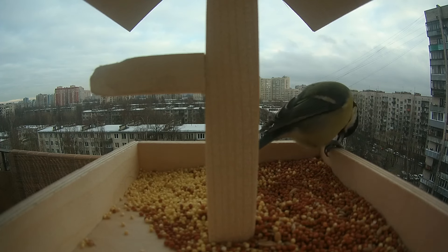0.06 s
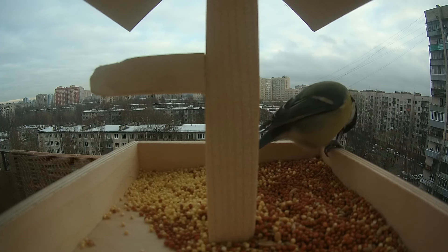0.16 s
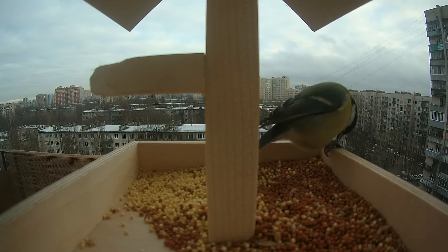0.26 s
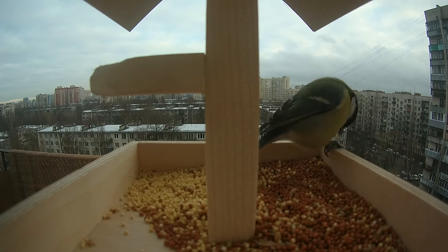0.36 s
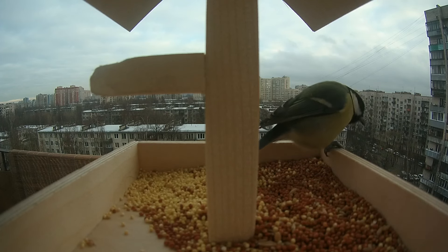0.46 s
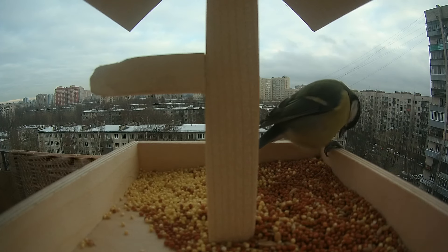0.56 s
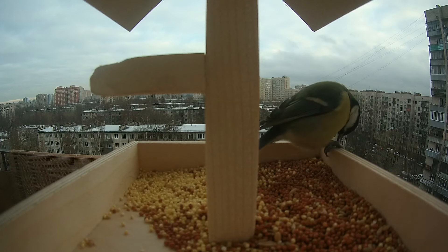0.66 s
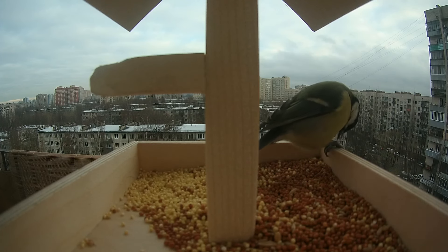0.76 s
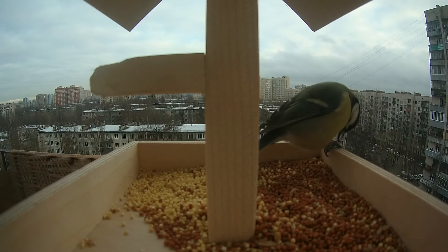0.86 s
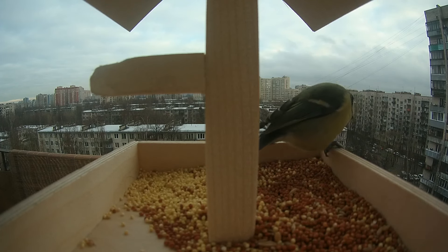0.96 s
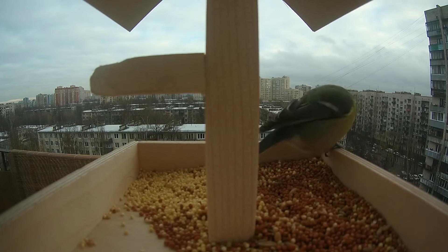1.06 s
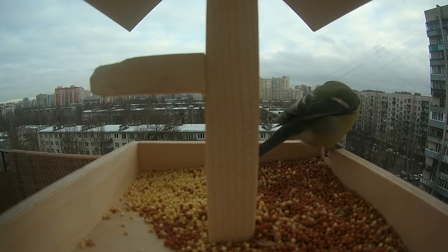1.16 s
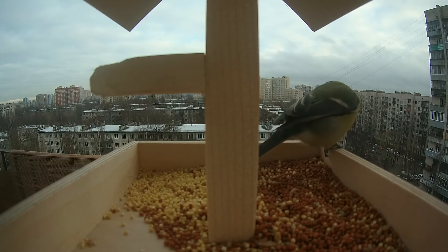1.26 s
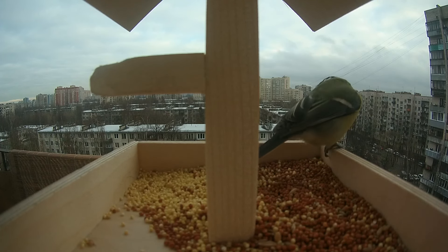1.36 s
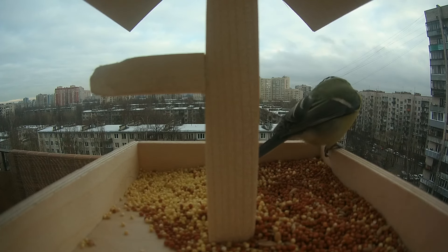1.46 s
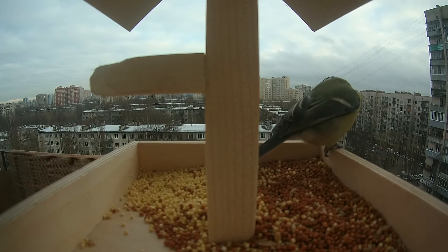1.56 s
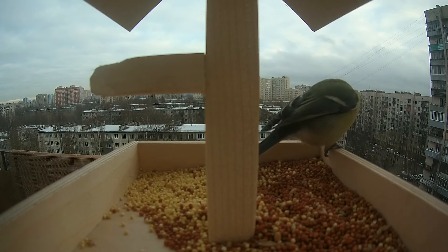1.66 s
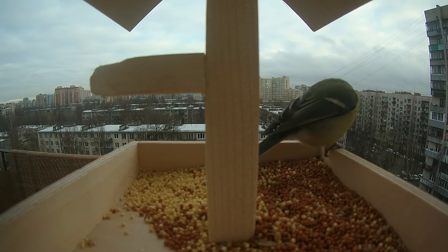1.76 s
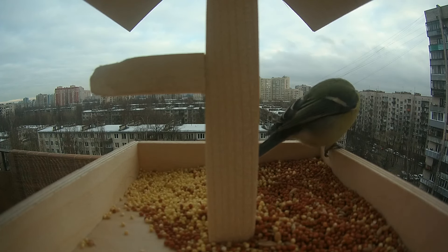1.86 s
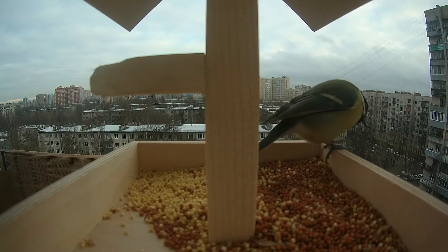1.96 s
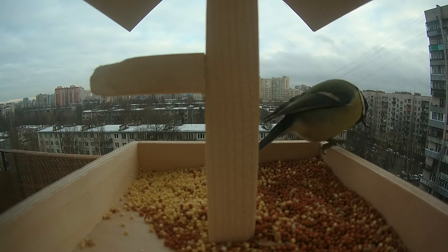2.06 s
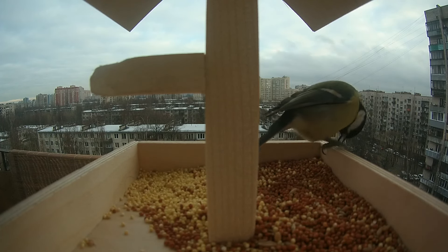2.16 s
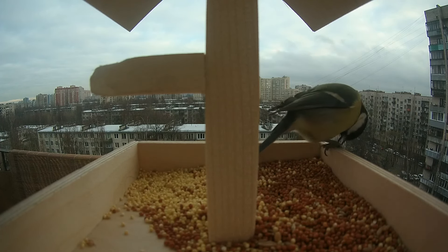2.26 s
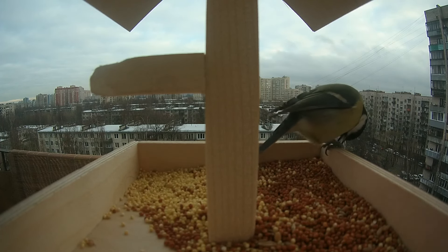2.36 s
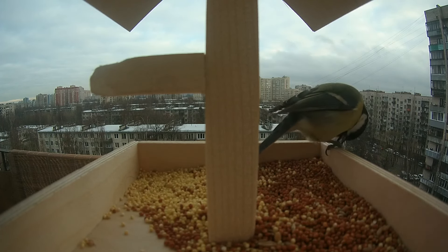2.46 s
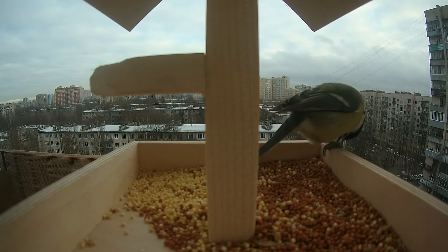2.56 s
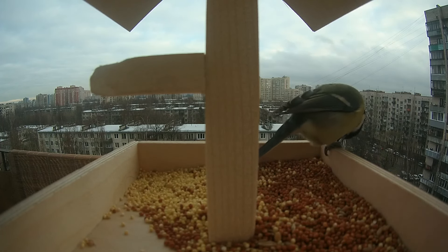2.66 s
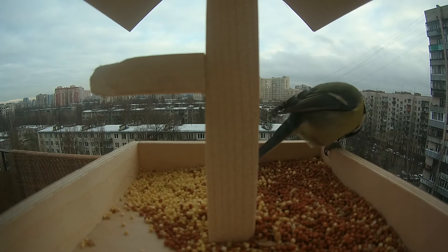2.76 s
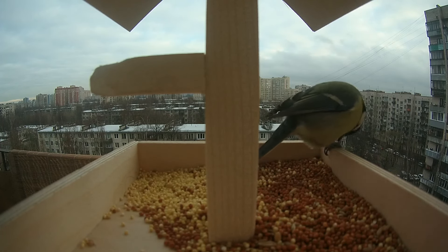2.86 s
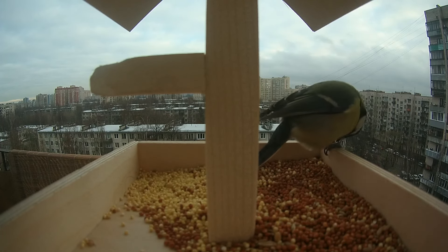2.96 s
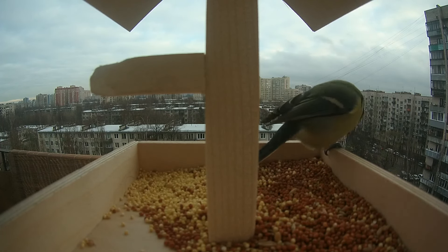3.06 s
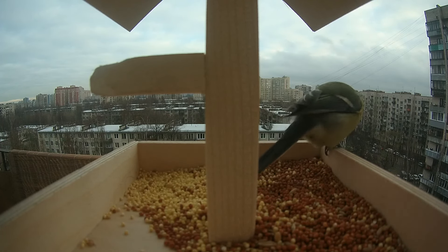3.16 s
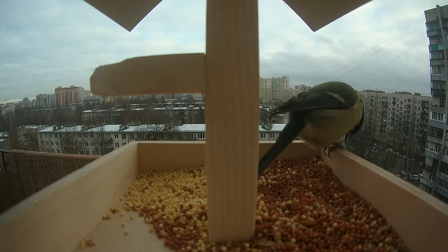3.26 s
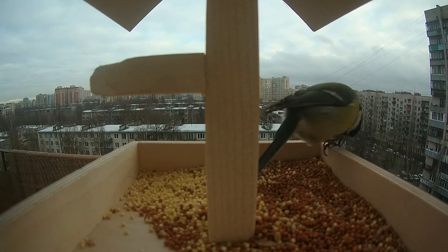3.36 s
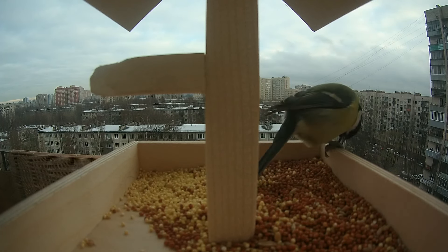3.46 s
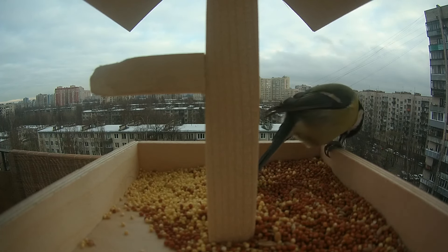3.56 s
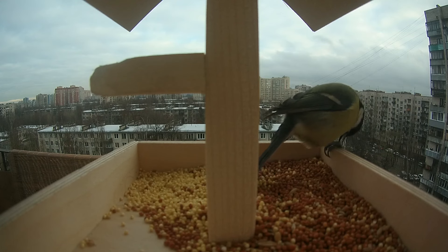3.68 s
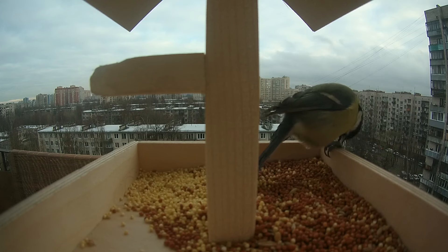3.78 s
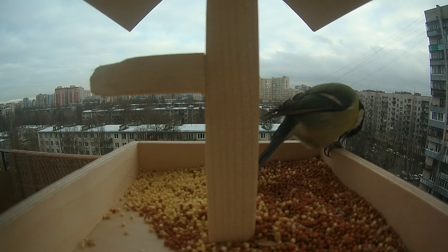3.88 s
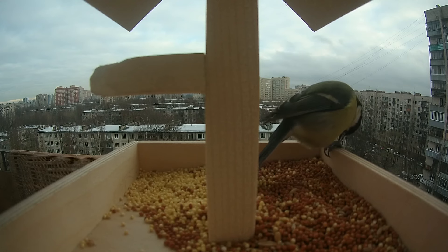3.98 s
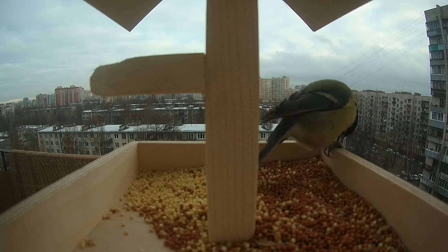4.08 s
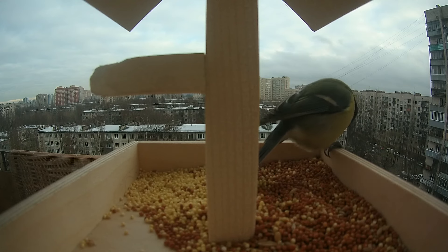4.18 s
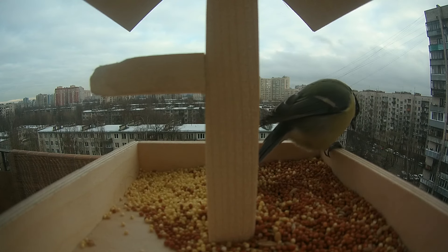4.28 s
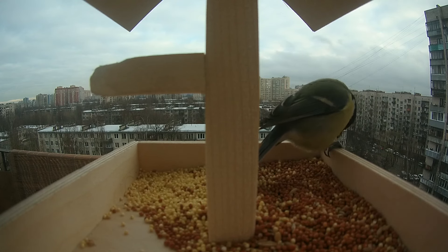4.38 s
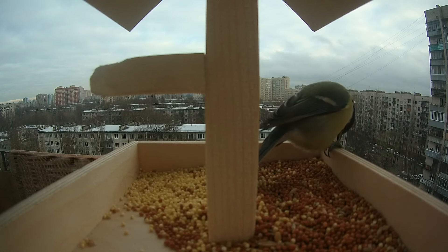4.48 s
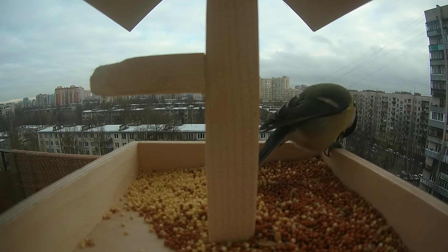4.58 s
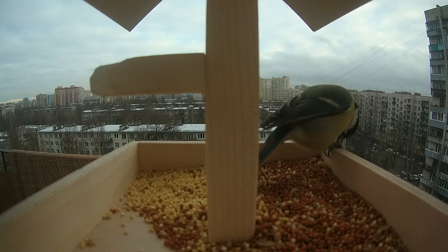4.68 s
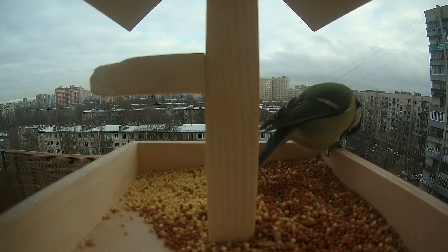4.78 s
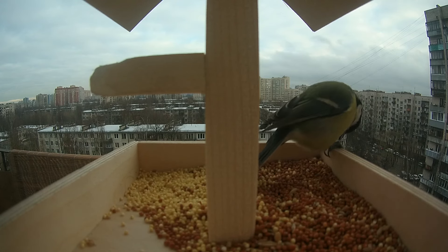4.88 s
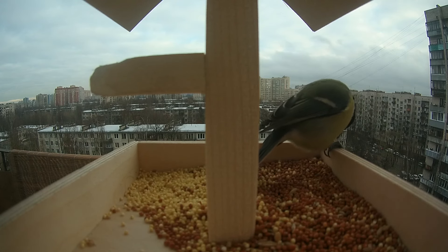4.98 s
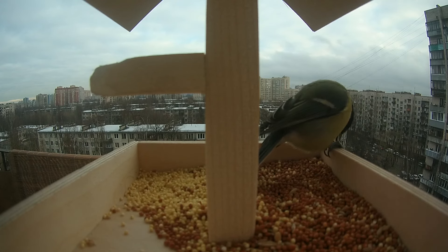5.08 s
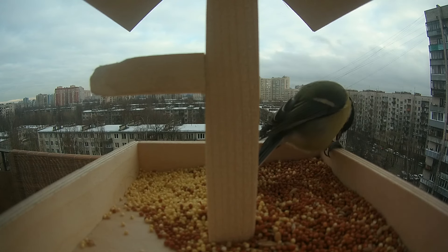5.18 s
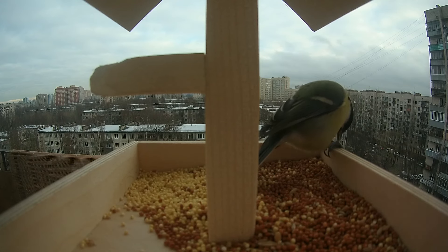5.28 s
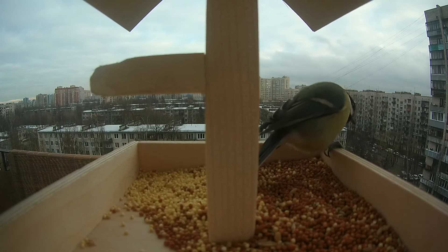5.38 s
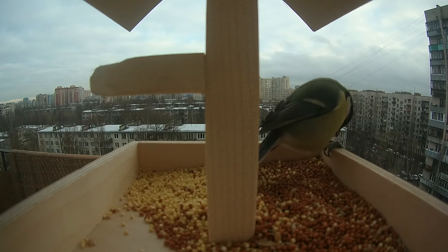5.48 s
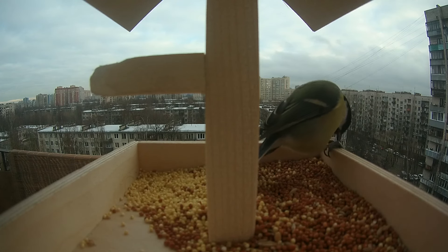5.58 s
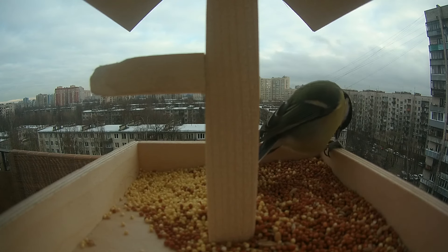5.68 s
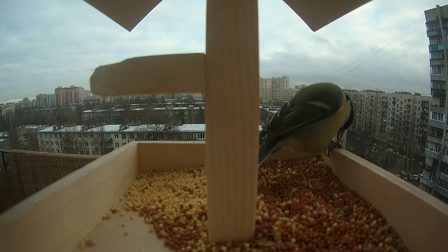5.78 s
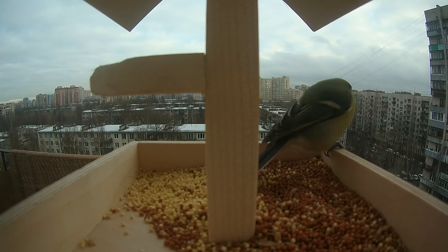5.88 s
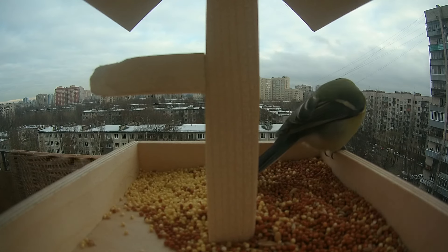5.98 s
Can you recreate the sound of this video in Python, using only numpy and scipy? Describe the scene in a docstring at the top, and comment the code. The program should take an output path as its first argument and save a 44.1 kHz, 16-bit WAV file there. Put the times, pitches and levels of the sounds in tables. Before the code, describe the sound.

Very close to the microphone, a small bird pecks at a wooden feeder tray on a balcony. A few woody taps come first, then a pause, then a busy irregular run with light nibbles and ticking seeds. Later blows are sparser and harder, the loudest near the end. Low wind rumble, distant town hiss and faint electronic buzzes lie behind.

```python
"""Sharp pecks: a small bird takes seed from a wooden feeder tray on a balcony, a hand's width from the microphone.
Each peck sums decaying modes: ticks of the thin boards, a thud of the walls, a long ring of the whole box.
Around the pecks: runs of light nibbles, short bright cracks of husks on some blows (noise bursts)
and faint ticks of seeds about each blow. Behind: a distant town, low wind rumble and hiss (filtered noise),
faint bursts of electronic buzz (gated bands of noise) and a thin whistle (sines) at the end."""
import sys
import numpy as np
from scipy import signal
from scipy.fft import rfft, irfft
from scipy.io import wavfile
from scipy.ndimage import uniform_filter1d

SR = 44100
rng = np.random.default_rng(int(sys.argv[2]) if len(sys.argv) > 2 else 0)


def digitize_waveform(pressure):
    """Quantize a signal to 16-bit integers and store it at the path in sys.argv[1].

    Rows of a 2-D input are taken as channels; values are limited to [-1, 1].
    """
    field = np.atleast_2d(pressure).T
    bounded = np.clip(field, -1, 1)
    quanta = np.round(bounded * 32767).astype(np.int16)
    wavfile.write(sys.argv[1], SR, quanta)


N = 265923
T = np.arange(N) / SR
RING_T = T[:SR // 2]

# beak and claw blows; box, wall and click levels are before their trims:
# start_s, tick_peak_db, box_db, wall_db, click_db, tick_centre_hz
PECKS = [(0.074, -36.5, -39, -50.5, -65, 1680), (0.2441, -34, -46, -35, -47.5, 1730),
         (0.2557, -40, -33.5, -52, -56, 1720), (0.3905, -24.5, -31, -38, -38, 1700),
         (0.7236, -40, -39.5, -43.5, -49, 1430), (0.8406, -29.5, -38, -40, -44.5, 1520),
         (2.0544, -42, -40.5, -35.5, -42, 1620), (2.155, -30, -38.5, -34.5, -46, 1400),
         (2.2754, -36, -44, -44, -48, 1420), (2.3313, -33, -44, -38.5, -48, 1400),
         (2.3904, -32, -39.5, -50, -67, 1680), (2.438, -40, -42, -42, -59, 1520),
         (2.5076, -35, -38.5, -46.5, -45.5, 1480), (2.5424, -30.5, -36.5, -55, -42, 1490),
         (2.6254, -31, -41.5, -48, -43.5, 1830), (2.685, -36.5, -43.5, -39, -50, 1410),
         (2.7112, -40, -48, -56, -47.5, 1370), (2.8437, -35, -43, -47, -44, 1750),
         (2.8672, -37, -59, -43.5, -66, 1390), (2.8958, -38, -41.5, -43.5, -71, 1430),
         (3.0371, -46.5, -32.5, -45, -61, 1400), (3.1606, -42, -39.5, -42.5, -64, 1750),
         (3.2787, -34.5, -40.5, -46, -60, 1410), (3.4503, -33, -41.5, -45.5, -48.5, 1470),
         (3.4673, -41.5, -43, -51, -54, 1380), (3.5056, -34, -41.5, -42, -50, 1480),
         (3.5699, -33.5, -53, -43.5, -58, 1690), (3.6489, -29.5, -35.5, -37, -45.5, 1550),
         (3.7971, -56, -36, -41.5, -62, 1710), (3.8202, -40, -47, -61, -55, 1510),
         (3.8825, -43.5, -46, -53, -49.5, 1440), (3.9898, -27.5, -29, -37.5, -44, 1480),
         (3.9955, -26, -35.5, -45, -55, 1740), (4.12, -40, -33.5, -44, -63, 1490),
         (4.18, -27.5, -26, -39.5, -45, 1610), (4.4988, -36.5, -39.5, -51, -56, 1700),
         (4.615, -37.5, -44, -47, -56, 1530), (4.79, -43, -63, -61, -45.5, 1700),
         (4.8395, -15, -26.5, -29.5, -33.5, 1730), (5.1566, -32.5, -35, -42.5, -54, 1600),
         (5.3039, -38, -30.5, -42, -45, 1480), (5.3208, -23.5, -52, -41, -50, 1630),
         (5.5116, -42.5, -54, -56, -48, 1430), (5.6268, -28.5, -45, -39, -50, 1670),
         (5.6405, -38.5, -52, -42.5, -63, 1510), (5.7958, -9.5, -24, -19.5, -39, 1730),
         (5.9761, -32.5, -41.5, -43.5, -64, 1550)]
# modes of the whole box: pitch_hz, relative_level_db, t60_s
BOX_MODES = [(55.5, -10, 0.49), (127, -5, 0.47), (153.5, -14, 0.36), (205.9, 0.5, 0.21),
             (228.7, -0.5, 0.23)]
# modes of the thin boards: pitch_hz, relative_level_db, t60_s
BOARD_MODES = [(756, -17, 0.069), (1024, -32, 0.11), (1376, -14, 0.051), (1505, -0.5, 0.024),
               (1654, 4, 0.019), (1760, 1.5, 0.012), (2009, -1.5, 0.02), (2320, -8, 0.021)]
# modes of the side walls: pitch_hz, relative_level_db, t60_s
WALL_MODES = [(298, -5, .06), (329, -5, .08), (367, 0, .13), (420, -4, .06), (474, -5, .1)]
# bright click of a hard contact: pitch_hz, relative_level_db, t60_s
CLICK_MODES = [(2960, -9, .016), (3180, 0, .022), (3290, -4, .018)]
# spectrum of the dense ring of the wood: freq_hz, relative_level_db
WOOD_SPECTRUM = [(400, 21), (750, -28), (950, -29), (1600, 32), (2200, -25), (2700, -6), (3200, 37),
                 (3500, -25), (6000, -52)]
# spectrum of the short-lived wall thud: freq_hz, relative_level_db
THUD_SPECTRUM = [(90, -23), (200, 2), (330, 1.5), (460, -12), (560, -43), (1100, -60), (3000, -80)]
# the bird works a seed with light nibbles: start_s, end_s
NIBBLE_RUNS = [(1.935, 2.02), (2.415, 2.44), (2.63, 2.66), (3.52, 3.54), (3.575, 3.595), (3.765, 3.785),
               (4.49, 4.52), (5.155, 5.172), (5.283, 5.3), (5.92, 5.965)]
# husks that snap under the beak, on some of the blows: start_s, peak_db
SNAPS = [(.391, -55), (2.056, -50), (2.331, -50), (2.542, -52), (4.18, -52), (4.8382, -34), (5.796, -52)]
# spectrum of a snap: freq_hz, relative_level_db
HUSK_SPECTRUM = [(2500, -60), (3900, 0.5), (4800, -2.5), (5600, -18), (6300, -4), (7400, -27), (9800, -11),
                 (12000, -40)]
# rumble level as wind and the bird's weight rock the feeder: time_s, gain_db
WIND_GAIN = [(0, -37.5), (0.45, -38.5), (0.62, -40.5), (1.2, -35.5), (1.65, -52), (2.1, -41.5), (2.62, -39),
             (2.8, -44), (3.38, -45.5), (3.65, -36), (4.2, -41.5), (4.4, -49), (4.9, -35), (5.15, -44),
             (5.75, -37.5), (6.03, -40.5)]
# spectrum of the rumble: freq_hz, relative_level_db
RUMBLE_SPECTRUM = [(10, -21.5), (25, -3.5), (37, -1), (55, -1.5), (68, -10), (100, -20.5), (160, -18.5),
                   (400, -57.5)]
# spectrum of town and microphone hiss: freq_hz, relative_level_db
AIR_SPECTRUM = [(41, -53), (70, -1.5), (147, -6.5), (315, -11.5), (632, -17.5), (809, -19.5), (886, -20),
                (1190, -22.5), (1300, -22), (1420, -22.5), (1620, -23.5), (1740, -25.5), (3260, -30),
                (3900, -31.5), (15000, -37)]
# regular trains of short buzzes that slip past each other: first_start_s, period_s
BUZZ_TRAINS = [(0.065, 0.3905), (0.201, 0.4)]
# bands of the short buzzes: centre_hz, half_width_hz (to 1/e), relative_level_db
SHORT_BUZZ_BANDS = [(8850, 450, -7), (9700, 450, -3), (13300, 650, -3), (14350, 550, 0), (15100, 400, -7)]
# bands of the long buzz: centre_hz, half_width_hz (to 1/e), relative_level_db
LONG_BUZZ_BANDS = [(8600, 300, -8), (9600, 320, -3), (11200, 450, -14), (12550, 180, -9), (13280, 220, 0),
                   (13920, 260, 2), (14750, 450, -2)]
# the long buzz: start_s, end_s
LONG_BUZZ_SPAN = (5.598, 5.93)
# whistle after the long buzz, lasting past the end of the sound: start_s, end_s
WHISTLE_SPAN = (5.932, 6.5)
# tones of the whistle: multiple of WHISTLE_HZ, rms_db
WHISTLE_TONES = [(6, -64), (7, -70), (9, -68), (10, -75)]

CLICK_TRIM_DB, BOX_TRIM_DB, THUD_TRIM_DB, WALL_TRIM_DB = 0.5, 3.0, 4.0, 3.0
SPOT_DB = 3  # each mode varies by up to this, either way, with the spot hit
BOX_LEAN_DB_PER_OCTAVE = -2.5
WALL_TOP_HZ = 482  # the thud is cut above this
# seeds under the beak: knock size against the blow, settling time; both hold at the tick level
# SCRAPE_DB and halve for a blow SCRAPE_HALVING_DB harder
CRUNCH, CRUNCH_S = 0.33, 0.008
SCRAPE_DB, SCRAPE_HALVING_DB = -36, 20
NIBBLE_GAP_S, NIBBLE_DB, NIBBLE_SCATTER_DB = 0.016, -42.5, 1.5  # spacing, tick level, its spread
NIBBLE_BOX_DB, NIBBLE_WALL_DB, NIBBLE_CLICK_DB = -6, -18, -16  # against the tick, before trims
NIBBLE_HZ = 1520  # median tick centre
SWAY_DB, SWAY_RATE_HZ = 1, 12  # quick unevenness of the rumble
AIR_RMS_DB = -49
TOWN_SWELL_DB, TOWN_FLICKER_DB = 0.5, 1.6
BURST_S = 0.047
BUZZ_CYCLE_HZ = 59.94
WHISTLE_HZ = 1425  # base pitch at the middle of WHISTLE_SPAN
TOP_HZ = 15300


def pecks():
    """The distinct blows of beak and claws on the tray."""
    out = np.zeros(N)
    for start_s, tick_db, box_db, wall_db, click_db, centre_hz in PECKS:
        add(out, start_s, blow(tick_db, box_db, wall_db, click_db, centre_hz))
    return out


def blow(tick_db, box_db, wall_db, click_db, centre_hz):
    """The struck spot flexes for a few cycles, the boards ring on, the walls thud, the heavy box rings longest."""
    push = contacts(tick_db)
    boards = ring(BOARD_MODES, rise_cycles=1.28, lean_db=27 * np.log2(centre_hz / 1680))
    t = RING_T[:len(boards)]
    flex = np.sin(2 * np.pi * centre_hz * t) * np.exp(-((t - .0013) / .0008) ** 2)
    tick = signal.fftconvolve(peak(flex, -1.1) + peak(boards, 0), push)
    wood = burst(WOOD_SPECTRUM, t60=0.0054, rise_s=0.00039)
    click = signal.fftconvolve(ring(CLICK_MODES, rise_cycles=4.45), push)
    box = ring(BOX_MODES, rise_cycles=0.72, lean_db=BOX_LEAN_DB_PER_OCTAVE)
    parts = [peak(tick, tick_db),
             peak(wood, tick_db - 13.5),
             peak(click, click_db + CLICK_TRIM_DB),
             *walls(wall_db),
             peak(box, box_db + BOX_TRIM_DB)]
    out = np.zeros(max(map(len, parts)))
    for part in parts:
        add(out, 0, part)
    return out


def contacts(tick_db, count=6):
    """Impulses: the blow, then seeds knocked on the wood; a hard blow goes straight through, a light one scrapes on."""
    push = np.zeros(SR // 20)
    push[0] = 1
    lightness = 2 ** ((SCRAPE_DB - tick_db) / SCRAPE_HALVING_DB)
    order = rng.uniform(0.1976, 1, count)
    lags_s = np.clip(CRUNCH_S * lightness * order, 0, .04)
    size = min(CRUNCH * lightness, 1)
    push[(lags_s * SR).astype(int)] += size * rng.choice([-1, 1], count) * np.exp(-order)
    return push


def walls(wall_db):
    """The side walls ring over a short, dull thud."""
    shake = peak(burst(THUD_SPECTRUM, t60=0.048, rise_s=0.00093), wall_db + THUD_TRIM_DB)
    thud = signal.sosfilt(signal.butter(6, WALL_TOP_HZ, fs=SR, output="sos"), shake)
    return [thud, peak(ring(WALL_MODES, rise_cycles=0.65), wall_db + WALL_TRIM_DB)]


def ring(modes, rise_cycles, lean_db=0):
    """Modes after one blow, each swelling over some cycles; the spot hit and lean_db (per octave) weight them."""
    hz, db, t60 = np.transpose(modes)[:, :, None]
    t = RING_T[:int(1.2 * SR * t60.max())]
    spot_db = rng.uniform(-SPOT_DB, SPOT_DB, hz.shape)
    gain = undb(db + spot_db + lean_db * np.log2(hz / hz.mean()))
    return np.sum(gain * np.sin(2 * np.pi * hz * t) * fade(t, t60, rise_cycles / hz), axis=0)


def burst(spectrum, t60, rise_s):
    """Many crowded modes that die away together: coloured noise under one decay."""
    t = RING_T[:SR // 8]
    return colour(rng.standard_normal(len(t)), spectrum) * fade(t, t60, rise_s)


def nibbles(jitter_s=0.004, spread_octaves=0.16):
    """Quick, uneven runs of light blows while the bird works a seed."""
    out = np.zeros(N)
    for start_s, end_s in NIBBLE_RUNS:
        for s in np.arange(start_s + NIBBLE_GAP_S / 2, end_s, NIBBLE_GAP_S):
            lag, size, spot = rng.standard_normal(3)
            db = NIBBLE_DB + NIBBLE_SCATTER_DB * size
            centre_hz = NIBBLE_HZ * 2 ** (spread_octaves * spot)
            nibble = blow(db, db + NIBBLE_BOX_DB, db + NIBBLE_WALL_DB, db + NIBBLE_CLICK_DB, centre_hz)
            add(out, s + jitter_s * lag, nibble)
    return out


def husks():
    """On some blows a husk gives way with a very short, bright crack."""
    out = np.zeros(N)
    for start_s, peak_db in SNAPS:
        add(out, start_s, peak(burst(HUSK_SPECTRUM, t60=0.021, rise_s=0.0017), peak_db))
    return out


def seeds(around_s=0.022, grain_db=-48, count=4):
    """Around each blow the beak brushes through loose seeds, which tick faintly on the boards."""
    out = np.zeros(N)
    for start_s, *_ in PECKS:
        for lag, size in rng.standard_normal((count, 2)):
            tick = ring(BOARD_MODES + CLICK_MODES, rise_cycles=0.36, lean_db=-6.5)
            add(out, start_s + 0.0091 + around_s * lag, peak(tick, grain_db + 2 * size))
    return out


def outdoors():
    """The rocking feeder rumbles; the town, below 900 Hz, wavers slightly under a steady hiss."""
    rocking_db = np.interp(T, *np.transpose(WIND_GAIN)) + SWAY_DB * walk(SWAY_RATE_HZ)
    wind = level(colour(rng.standard_normal(N), RUMBLE_SPECTRUM), -3.13) * undb(rocking_db)
    air = level(colour(rng.standard_normal(N), AIR_SPECTRUM), AIR_RMS_DB)
    town = signal.sosfilt(signal.butter(2, 900, fs=SR, output="sos"), air)
    waver_db = TOWN_SWELL_DB * walk(1.55) + TOWN_FLICKER_DB * walk(9.0)
    return wind + air + town * (undb(waver_db) - 1)


def electronics():
    """Circuits sizzle faintly throughout, with short bursts, then one long, more regular buzz and a thin whistle."""
    def gate(start_s, end_s):
        return np.clip(np.minimum(T - start_s, end_s - T) / 0.0032, 0, 1)
    starts = [s for first_s, period_s in BUZZ_TRAINS for s in np.arange(first_s, LONG_BUZZ_SPAN[0], period_s)]
    bursts = sum(gate(s, s + BURST_S) for s in starts)
    short = sizzle(SHORT_BUZZ_BANDS, fresh=1.0) * (undb(-69.5) + undb(-61) * bursts)
    long = sizzle(LONG_BUZZ_BANDS, fresh=0.81) * undb(-57.0) * gate(*LONG_BUZZ_SPAN)
    whistling = gate(*WHISTLE_SPAN)
    # pitch creeps upward, 8 % of WHISTLE_HZ per second
    turns = WHISTLE_HZ * np.cumsum(1 + .08 * (T - np.mean(WHISTLE_SPAN)) * whistling) / SR
    whistle = sum(np.sqrt(2) * undb(db) * np.sin(2 * np.pi * k * turns) for k, db in WHISTLE_TONES)
    return short + long + whistle * whistling


def sizzle(bands, fresh):
    """Noise bands in three uneven spurts a cycle; the same crackle returns each cycle, plus a share of fresh noise."""
    phase = T * BUZZ_CYCLE_HZ % 1
    repeated = rng.standard_normal(SR)[(phase * SR / BUZZ_CYCLE_HZ).astype(int)]
    spurts = 0.34 + sum(size * np.exp(-((phase - at) / 0.045) ** 2)
                        for at, size in [(.15, 0.64), (.39, 1), (.68, 0.82)])
    crackle = (repeated + fresh * rng.standard_normal(N)) * spurts
    f = np.fft.rfftfreq(N, 1 / SR)
    gain = sum(undb(db) * np.exp(-((f - hz) / width_hz) ** 2) for hz, width_hz, db in bands)
    return level(irfft(rfft(crackle) * gain, N), 0)


def undb(db):
    """Decibels to gain."""
    return 10 ** (np.asarray(db) / 20)


def level(x, db):
    """Scale to an rms level."""
    return x * undb(db) / np.sqrt(np.mean(x ** 2))


def peak(x, db):
    """Scale to a peak level."""
    return x * undb(db) / np.abs(x).max()


def add(out, start_s, x):
    """Mix x into out from start_s on."""
    i = int(np.clip(start_s * SR, 0, N - 1))
    out[i:i + len(x)] += x[:N - i]


def colour(x, spectrum):
    """Filter by a (Hz, dB) spectrum, interpolated over log frequency."""
    hz, db = np.transpose(spectrum)
    f = np.maximum(np.fft.rfftfreq(len(x), 1 / SR), 1)
    return irfft(rfft(x) * undb(np.interp(np.log(f), np.log(hz), db)), len(x))


def walk(rate_hz):
    """Random levels held 1 / rate_hz s and slewed twice; spread near 1."""
    k = int(SR / rate_hz)
    held = np.repeat(rng.standard_normal(N // k + 1), k)
    return 1.3 * uniform_filter1d(uniform_filter1d(held, k), k)[:N]


def fade(t, t60, rise_s):
    """A smooth rise and an exponential decay."""
    return undb(-60 * t / t60) * (1 - np.exp(-(t / rise_s) ** 2))


def scene():
    """Everything at the one microphone."""
    return (pecks() + nibbles() + husks() + seeds() + outdoors() + electronics())[None]


def record(dry):
    """A steep low-pass cuts the top."""
    return signal.sosfilt(signal.ellip(10, .2, 70, TOP_HZ, fs=SR, output="sos"), dry)


dry = scene()
out = record(dry)
digitize_waveform(out)
```